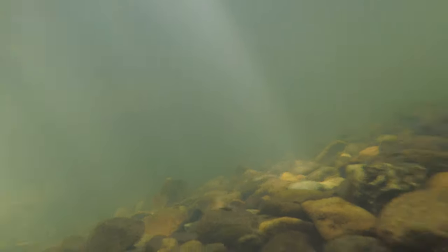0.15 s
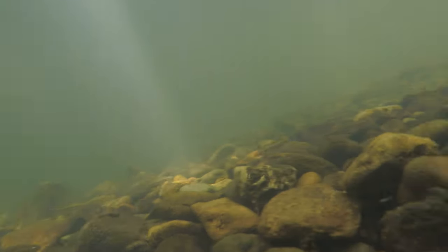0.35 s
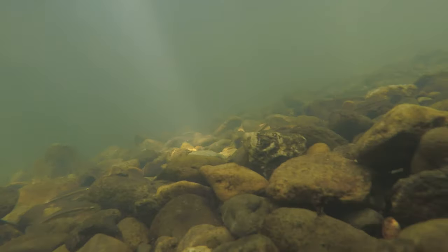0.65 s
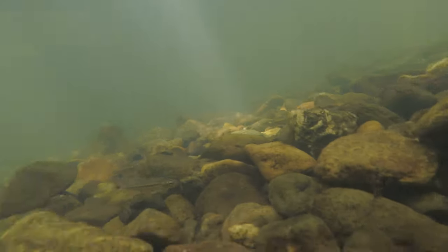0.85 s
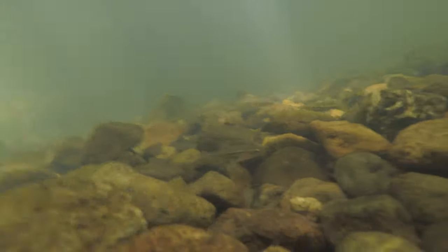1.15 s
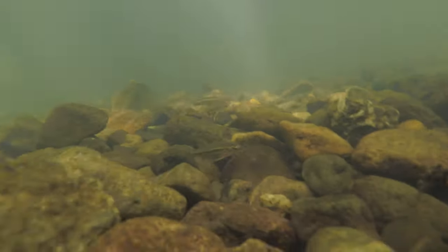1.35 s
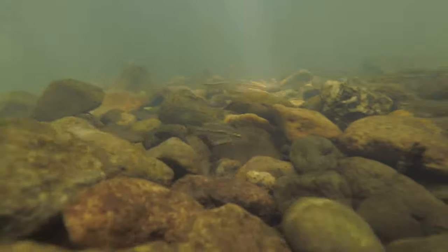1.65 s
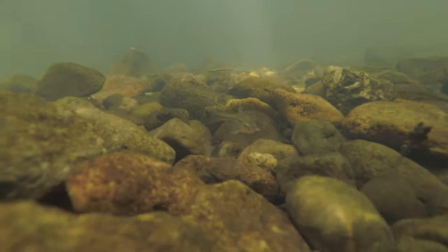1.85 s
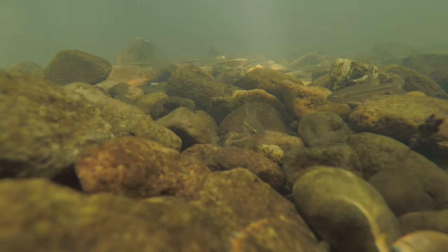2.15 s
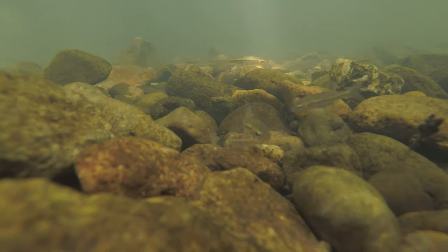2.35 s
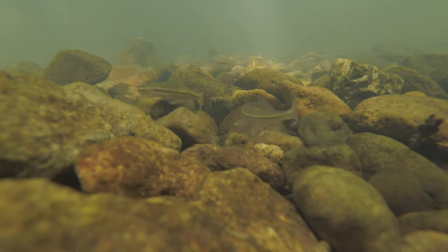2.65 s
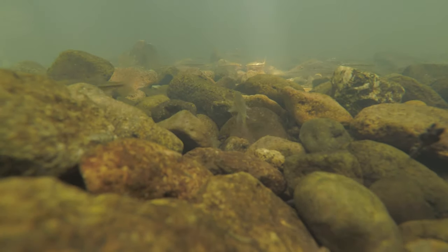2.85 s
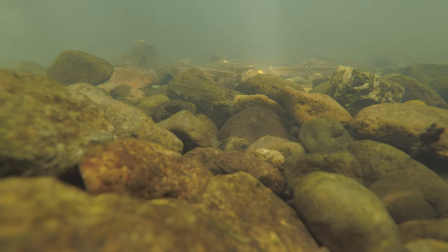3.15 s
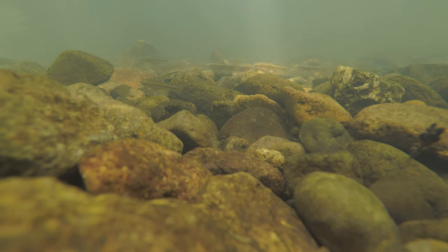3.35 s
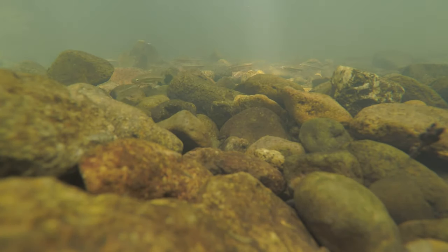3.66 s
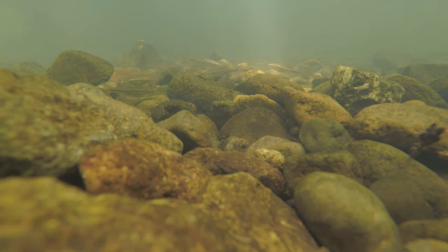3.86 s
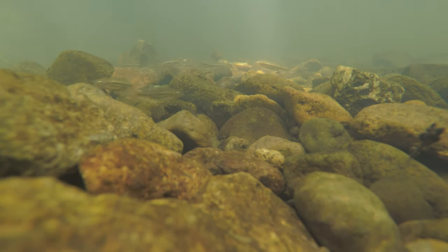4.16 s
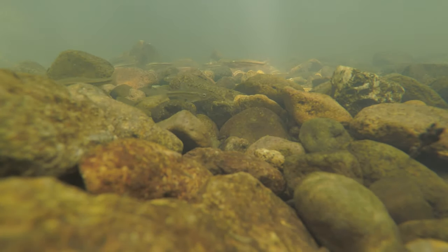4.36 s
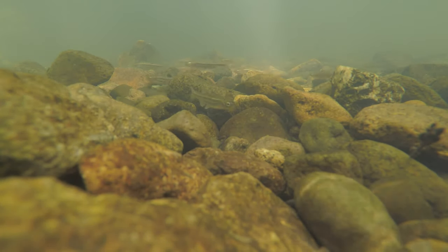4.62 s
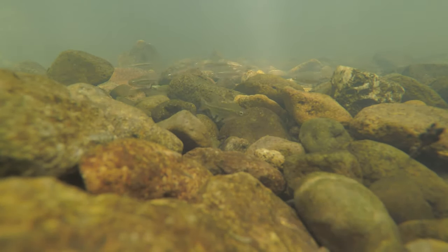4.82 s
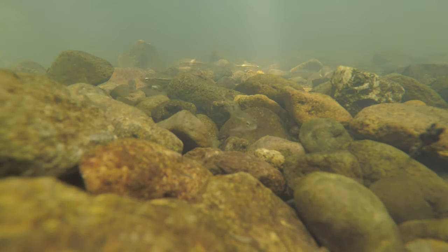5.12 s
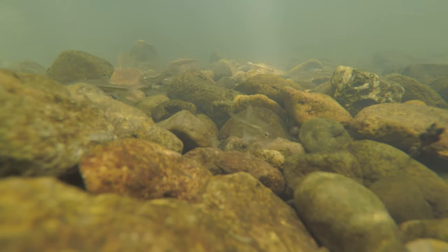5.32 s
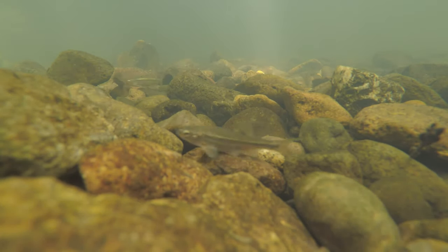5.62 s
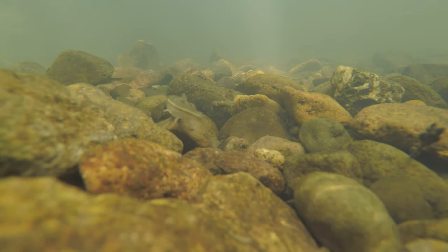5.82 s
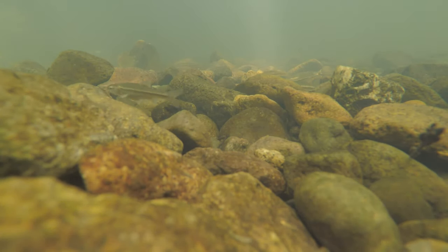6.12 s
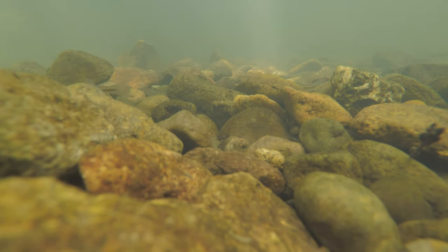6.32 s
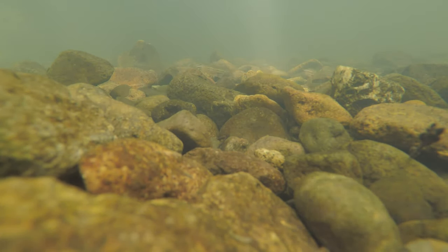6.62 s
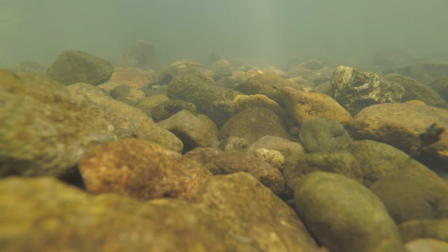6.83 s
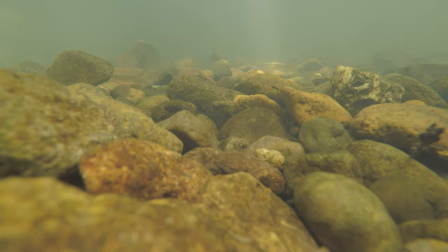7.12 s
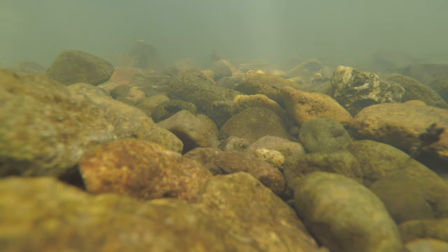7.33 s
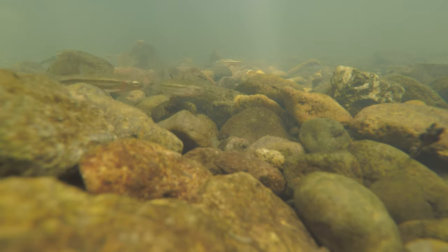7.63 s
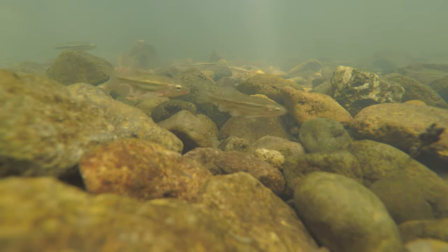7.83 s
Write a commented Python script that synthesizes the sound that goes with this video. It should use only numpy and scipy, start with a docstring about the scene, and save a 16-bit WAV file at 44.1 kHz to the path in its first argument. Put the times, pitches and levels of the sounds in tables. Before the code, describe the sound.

A sealed camera housing knocks against stones on a creek bed, heard close and muffled from inside. For the first 2 seconds, hollow bumps, low thuds and short grinding scrapes come in quick clusters with a few sharp clicks, loudest around 0.5 and 1.6 seconds. It falls almost silent until about 2.7 seconds, when a couple of thuds and a deep push of water lead into lighter, scattered bumps. Near 4.7 seconds a heavier, low grinding bump swells with the rumbling current. From about 5.2 seconds the housing drags over rock in rough strokes, and the sound widens from the centre into stereo. Tiny bubbles plink, singly at first, then in flurries around 6.5 and 7.5 seconds, with one louder plink at 7.5. A faint hiss grows beneath the rubbing until the end at about 8 seconds.

```python
"""Creek bed, heard through the shell of a sealed camera housing set down among stones.
The housing bumps and grinds on rock, lies still, then is dragged in strokes. Blows and slips ring its
shell modes; lurches and eddies drive the low ones. Small bubbles snap off and plink. Hiss swells as
the bumps die out, and one centred channel opens into two microphones that hear the shell through
different paths."""
import sys
import numpy as np
from scipy import signal
from scipy.fft import rfft, irfft, next_fast_len
from scipy.io import wavfile
from scipy.ndimage import uniform_filter1d, minimum_filter1d

SR = 44100
rng = np.random.default_rng(int(sys.argv[2]) if len(sys.argv) > 2 else 0)


def log_audio(samples):
    """Write samples as a 16-bit WAV file to the path given in sys.argv[1]."""
    # one column per channel
    frames = np.atleast_2d(samples).T
    # limit to full scale, then quantise
    limited = np.clip(frames, -1, 1)
    pcm = np.round(limited * 32767).astype(np.int16)
    wavfile.write(sys.argv[1], SR, pcm)


N = 351918
FFT_SIZE = next_fast_len(N + 4096)
BIN_HZ = np.maximum(np.arange(FFT_SIZE // 2 + 1) * SR / FFT_SIZE, 1)

# bumps on stone: peak t/s, level/dB, length/ms, centre f/Hz, thud/dB
STONE_BUMPS = [(.125, -34, 45, 720, -39), (.163, -29.5, 15, 733, -50), (0.207, -28, 16, 743, -29.5),
               (.231, -27.5, 10, 643, -42), (0.252, -25.5, 3.3, 753, -43), (0.27, -26, 11, 564, -24),
               (.307, -24.5, 31, 530, -26), (.331, -20.5, 11, 720, -32), (.345, -17, 24, 647, -23),
               (.398, -21, 9.2, 624, -36), (.41, -19, 8.7, 789, -26), (.467, -17.5, 35, 720, -22.5),
               (.491, -10, 18, 630, -16.5), (0.53, -20, 20, 560, -19.5), (0.565, -30.5, 6.2, 620, -47),
               (0.625, -46.5, 34, 560, -58), (0.698, -31, 12.2, 870, -41), (.755, -36, 11.4, 795, -38.5),
               (0.788, -40.5, 10.6, 776, -41.5), (.981, -20.5, 14.8, 826, -29.5),
               (1.003, -18.5, 24, 714, -36), (1.148, -19.5, 9.6, 378, -28.5), (1.191, -26.5, 7.1, 680, -33),
               (1.248, -16, 12.3, 470, -18.5), (1.307, -15, 17, 766, -18.5),
               (1.333, -15.5, 13.5, 730, -26.5), (1.417, -24, 8.7, 512, -23), (1.477, -22, 10, 680, -26),
               (1.543, -17, 8.6, 715, -28), (1.572, -12, 6, 900, -17.5), (1.608, -32.5, 12, 670, -28.5),
               (1.675, -39.5, 4.4, 750, -52), (1.741, -22, 13, 746, -33), (1.751, -16.5, 12, 618, -24.5),
               (1.797, -27.5, 9.7, 690, -24.5), (1.814, -19.5, 10, 804, -30.5), (1.903, -37, 33, 665, -40),
               (1.973, -21, 2.5, 737, -18.5), (1.988, -22, 14, 625, -21.5), (2.04, -19.5, 8.7, 855, -26),
               (2.124, -53, 24, 690, -62), (2.293, -55.5, 9.1, 702, -73), (2.568, -54.5, 27, 775, -54),
               (2.63, -56, 3.8, 890, -69), (2.732, -48, 12, 623, -44), (2.788, -36.5, 71, 468, -35.5),
               (2.857, -31, 5.9, 700, -13), (2.902, -48, 11, 520, -32), (2.984, -47.5, 49, 898, -64),
               (3.014, -36, 17, 553, -37.5), (3.061, -32, 14, 678, -24), (3.074, -38, 7.4, 455, -19.5),
               (3.232, -44.5, 7, 418, -39), (3.303, -46, 54, 415, -57), (3.382, -38, 18, 342, -39.5),
               (3.518, -35, 8.5, 354, -48), (3.616, -39, 25, 460, -53), (3.649, -34, 13, 400, -37),
               (3.685, -41, 12, 775, -51), (3.728, -46, 25, 674, -49), (3.752, -39, 10, 570, -34),
               (3.775, -39, 24, 550, -38), (3.87, -37.5, 26, 410, -34), (3.904, -25.5, 11, 504, -28.5),
               (3.935, -38, 9.5, 546, -33), (3.955, -37, 6.1, 830, -32), (4.051, -32, 8.8, 460, -35.5),
               (4.133, -33.5, 8.3, 650, -63), (4.222, -39, 28, 557, -41.5), (4.253, -46, 6.2, 596, -49),
               (4.391, -27.5, 16, 564, -63), (4.424, -29, 4.4, 460, -31), (4.46, -36.5, 18, 440, -60),
               (4.488, -39.5, 6, 700, -34), (4.544, -31, 17, 547, -25), (4.586, -34, 35, 564, -47),
               (4.635, -24.5, 15, 556, -48), (4.689, -30, 65, 580, -40), (4.75, -17.5, 64, 320, -18),
               (4.799, -19.5, 98, 357, -21.5), (4.847, -21, 100, 406, -23), (4.929, -39, 27, 550, -25.5),
               (4.972, -37.5, 47, 630, -45), (5.04, -32, 16, 687, -54), (5.102, -43.5, 13, 490, -24.5),
               (5.208, -23.5, 46, 887, -40), (5.235, -27, 19, 556, -55), (5.545, -28, 10, 584, -20),
               (6.285, -31.5, 14, 965, -46), (7.346, -34, 26, 830, -51)]
# shell response: f/Hz, centred/dB, left/dB, right/dB
SHELL_RESPONSE = [(186, 0, -3, -35), (268, 1.5, -12, -8.5), (422, -12.5, -10, -3.5), (544, 3.5, -8.5, -4.5),
                  (753, -8, 5.5, 2), (870, 1.5, 9.5, -12), (1032, -9, -2.5, -30), (1045, -12, -1.5, -13),
                  (1390, -20.5, 5, -2), (1600, -29, -6.5, -1.5), (1604, -20, -19, -3),
                  (2095, -39, -8.5, -12), (2980, -50.5, -42.5, -43.5), (4400, -56.5, -45.5, -40.5),
                  (5100, -67.5, -58.5, -53.5), (5500, -65.5, -47, -50), (7940, -76, -66.5, -42),
                  (11000, -76, -62.5, -57)]
# phase lead of left over right: f/Hz, lead/rad
LEFT_LEAD = [(200, 0), (300, -1.1), (430, -4.1), (550, -5.1), (690, -4), (900, -3.5), (1100, 1.2),
             (1300, 3.3), (1550, 4.1), (1800, 3.5), (2400, 3.5), (2900, 5.1), (4000, 7), (5500, 5.6),
             (7000, 6), (8000, 9.4)]
# stereo opening: t/s, two-microphone share
PAIR_SHARE = [(0, 0.009), (5.25, 0), (5.6, 0.36), (6.0, 0.69), (6.6, 0.91), (7.98, 0.86)]


def amp(db):
    return 10 ** (np.asarray(db) / 20)


def unit_rms(x):
    return x / np.sqrt(np.mean(x ** 2) + 1e-20)


def in_time(rows):
    """Table columns as per-sample curves."""
    times, *columns = np.transpose(rows)
    return [np.interp(np.arange(N) / SR, times, c) for c in columns]


def at_hz(rows, hz):
    """Table columns read on a log-frequency axis."""
    f, *columns = np.transpose(rows)
    return [np.interp(np.log(hz), np.log(np.maximum(f, 1)), c) for c in columns]


def shaped(x, response):
    return irfft(rfft(x, FFT_SIZE) * response, FFT_SIZE)[..., :N]


def drift(rate_hz):
    """Smooth random curve, unit rms."""
    r = np.exp(-2 * np.pi * rate_hz / SR)
    return unit_rms(signal.lfilter([1], [1, -2 * r, r * r], rng.standard_normal(N + SR))[SR:])


def ring(clicks, hz, t60_s):
    """One mode: a unit click starts a unit decaying sine."""
    r, w = amp(-60 / (t60_s * SR)), 2 * np.pi * hz / SR
    return signal.lfilter([0, np.sin(w)], [1, -2 * r * np.cos(w), r * r], clicks + 1e-18)


def plateau(t, start_s, length_s, rise_db_per_s, fall_db_per_s):
    """Unit gain during a contact, linear dB slopes either side."""
    before_s, after_s = np.maximum(start_s - t, 0), np.maximum(t - start_s - length_s, 0)
    return amp(-rise_db_per_s * before_s - fall_db_per_s * after_s)


def bumps(spread_oct, skirt_db, rise_share, sink_ms_per_oct, edge_hz, edge_share, blow):
    """Shell hits stone: a short grind, sinking in pitch, round one clean blow with a bright edge."""
    # bump spectrum: f/Hz, density/dB
    spectrum = [(120, -21), (200, 10), (379, -4.5), (561, -1), (753, 0.5), (1130, 0), (1230, -4),
                (2330, -43.5), (3080, -52), (10000, -75.5), (13000, -106), (22000, -120)]
    size = 4096
    out = np.zeros(N + 2 * size)
    ms = (np.arange(size) - size // 2) * 1000 / SR
    hz = np.maximum(np.arange(size // 2 + 1) * SR / size, 1)
    colour = amp(at_hz(spectrum, hz)[0])
    bright = 1 / (1 + (edge_hz / hz) ** 6)
    for s, db, length_ms, centre_hz, _ in STONE_BUMPS:
        grind = rng.standard_normal(size)
        rise_ms, fall_ms = rise_share * length_ms, (1 - rise_share) * length_ms
        swell = np.exp(-.8 * np.where(ms < 0, np.abs(ms / rise_ms) ** 1.4, np.abs(ms / fall_ms) ** 1.13))
        strike = blow * np.linalg.norm(swell) * (ms == 0)
        focus = np.exp(-.5 * (np.log2(hz / centre_hz) / spread_oct) ** 2) + amp(skirt_db)
        delay_s = sink_ms_per_oct / 1000 * np.clip(np.log2(centre_hz / hz), -1, 2)  # low modes lag
        sink = np.exp(-2j * np.pi * np.cumsum(delay_s) * SR / size)
        body = rfft(grind * swell + strike) * focus * (1 - bright) * sink
        edge_env = np.exp(-np.abs(ms / (edge_share * min(rise_ms, fall_ms))) ** 1.4)
        edge_db = 1.6 * (db + 23.5) - 11.5 + 24 * np.log2(centre_hz / 700)  # hard, high bumps: brighter
        edge = rfft(grind * edge_env) * bright * amp(edge_db)
        burst = irfft((body + edge) * colour) * signal.windows.tukey(size, .5)
        peak_rms = np.sqrt(uniform_filter1d(burst ** 2, size=350).max())
        at = round(s * SR) + size // 2
        out[at:at + size] += amp(db) * burst / peak_rms
    return out[size:size + N]


def thuds(soft_hz, gain_db, early_ms, scatter_db):
    """The housing lurches at each bump: a soft push into its low modes, each with its own strength."""
    # housing modes: f/Hz, level/dB, t60/s
    modes = [(40.7, -12.5, 0.21), (70, -1.5, 0.13), (87, 0.5, 0.11), (123.8, 4.5, 0.09),
             (162.3, 1.5, 0.067), (253, -9, 0.02), (344.8, -14, 0.12)]
    at = [round((row[0] - early_ms / 1000) * SR) for row in STONE_BUMPS]
    thud_db = np.array(STONE_BUMPS)[:, -1] + gain_db
    offset_db = scatter_db * rng.standard_normal((len(at), len(modes)))
    out = np.zeros(N)
    for k, (hz, db, t60_s) in enumerate(modes):
        pushes = np.zeros(N)
        pushes[at] = amp(thud_db + db + offset_db[:, k]) * (-1) ** k
        out += ring(pushes, hz, t60_s)
    return signal.lfilter(*signal.butter(1, soft_hz, fs=SR), out)


def contact_levels(wear_db_per_s, scuff_db, stir_db):
    """Rub, rumble, coarse and fine grit in dB: strokes and bump scuffs over the settling floor."""
    # strokes on stone: t/s, length/s, rub/dB, swell by the end/dB, rumble/dB, coarse/dB, fine/dB
    strokes = [(0.193, 0.32, -33, 4, -43.5, -59.5, -79), (0.456, 0.047, -43, -7.5, -45, -44.5, -66),
               (0.78, 0.1, -62, -1.5, -52.5, -77, -100), (1.141, 0.19, -30.5, -7.5, -37.5, -78, -84.5),
               (1.433, 0.077, -56.5, 12.5, -53.5, -85, -100), (1.548, 0.025, -29.5, 5, -55, -46, -71.5),
               (1.607, 0.04, -46.5, 2, -43.5, -78, -101), (1.712, 0.1, -34.5, -3, -40, -62, -83),
               (1.879, 0.064, -52.5, 16, -53, -69, -99), (1.959, 0.05, -37, 8.5, -36, -47, -86),
               (2.765, 0.025, -48, 2, -39.5, -51, -72.5), (2.833, 0.02, -41.5, 13, -36, -51.5, -68.5),
               (4.693, 0.2, -28.5, -8.5, -24.5, -88, -74.5), (5.197, 0.37, -24.5, 5.5, -33.5, -49, -70.5),
               (5.59, 0.23, -32.5, 2.5, -37.5, -65, -95), (5.858, 0.23, -24.5, -2.5, -35, -52.5, -73.5),
               (6.074, 0.16, -22, -3.5, -33, -68, -85), (6.778, 0.28, -33, 6, -45.5, -54, -70),
               (6.81, 0.024, -47, -3, -60, -64, -71.5), (7.637, .07, -45, 8, -70, -56.5, -73),
               (7.61, 0.55, -33, -1, -63, -57, -71)]
    # floor as the housing settles: t/s, rub/dB, rumble/dB
    settling = [(0, -36.5, -47), (.1, -44.5, -40), (.62, -52, -59), (.93, -81, -67.5), (2.35, -86.5, -77),
                (2.7, -66.5, -50.5), (3.1, -63.5, -61), (3.4, -64.5, -56), (3.6, -45, -45),
                (4.2, -54, -47.5), (4.52, -44, -46), (4.65, -42, -31.5), (5.0, -53, -32), (6.3, -37, -43.5),
                (6.55, -36.5, -45), (7.1, -36, -46.5), (7.3, -46, -52.5), (7.6, -39, -54), (7.98, -39, -47)]
    # grit floor: t/s, coarse/dB, fine/dB
    settling_grit = [(0, -94.5, -100), (2.6, -90, -100), (3.5, -71, -83.5), (5.2, -65.5, -88),
                     (6.3, -63, -82.5), (6.8, -65, -81), (7.3, -76.5, -84), (7.6, -61, -82.5),
                     (7.98, -81, -91)]
    t = np.arange(0, N, 32) / SR
    power = np.zeros((4, len(t)))
    for s, length_s, rub_db, swell_db, rumble_db, coarse_db, fine_db in strokes:
        gain = plateau(t, s, length_s, rise_db_per_s=705, fall_db_per_s=453.5)
        along_s = np.clip(t - s, 0, length_s)
        swell, wear = swell_db * along_s / length_s, -wear_db_per_s * along_s
        power += (gain * amp([rub_db + swell, rumble_db + swell, coarse_db + wear, fine_db + wear])) ** 2
    for s, db, _, _, thud_db in STONE_BUMPS:  # each scuffs the stone and stirs the water
        gain = plateau(t, s, 0, rise_db_per_s=504, fall_db_per_s=365)
        power[:2] += (gain * amp([[db + scuff_db], [thud_db + stir_db]])) ** 2
    floor = amp(in_time(settling) + in_time(settling_grit)) ** 2
    return 10 * np.log10(floor + [np.interp(np.arange(N) / SR, t, p) for p in power])


def rubbing(rub_db, coarse_db, fine_db, slips_per_s, coarse_hz, fine_hz):
    """Dense, lumpy slips on rough stone; grit breaks in bursts and rings the upper modes."""
    # unevenness of the rub: t/s, depth/dB
    rocking = [(3.0, 1.5), (3.5, 2.6), (4.6, 2.5), (5.2, 1.03)]
    slips = (rng.random(N) < slips_per_s / SR) * rng.choice([-1, 1], N)
    size_db = 3 * np.minimum(rng.exponential(1, N), 4)
    lumps_db = in_time(rocking)[0] * (drift(32) + 1.14 * drift(21))
    shell = amp(at_hz(SHELL_RESPONSE, BIN_HZ)[0])
    shell = shell / (1 + (210 / BIN_HZ) ** 4) / (1 + (BIN_HZ / 11000) ** 6)
    high, higher = (1 / (1 + (hz / BIN_HZ) ** 8) for hz in (coarse_hz, fine_hz))
    bands = shell * [1 - high, high * (1 - higher), higher]
    body, coarse, fine = shaped(slips * amp(size_db + lumps_db), bands)
    crunch = amp(2 * (drift(120) + 0.69 * drift(13)))
    coarse, fine = crunch * shell_ring([coarse, fine])
    return amp(rub_db) * unit_rms(body) + amp(coarse_db) * unit_rms(coarse) + amp(fine_db) * unit_rms(fine)


def taps(decay_ms, bands_hz, gain_db):
    """Hard touches inside the grinds: brief noise puffs, each with its own share of treble."""
    # touches: t/s, level/dB, treble re level/dB
    touches = [(0.2196, -32, -20), (0.2318, -43, -36), (0.2658, -30, -40), (0.3017, -28.5, -32.5),
               (0.3394, -21, -26), (0.3918, -28.5, -19), (0.4078, -33.5, -13), (0.457, -28, -23),
               (0.4872, -18.5, -23), (0.4912, -12, -20), (0.5268, -20.5, -29), (0.6952, -44, -41),
               (0.9768, -25.5, -34), (0.9986, -44.5, -33), (1.1408, -31, -37), (1.2372, -46, -33.5),
               (1.3042, -23.5, -36), (1.3319, -18, -27), (1.5388, -34.5, -18), (1.559, -23.5, -17.5),
               (1.571, -14.5, -18.5), (1.6066, -38.5, -28), (1.7335, -44, -25), (1.788, -45, -34),
               (1.8135, -34.5, -32.5), (1.963, -22, -29), (1.9751, -14.5, -31.5), (1.9883, -38, -33),
               (2.033, -46.5, -28), (3.0579, -37, -8)]
    out, t = np.zeros((2, N)), np.arange(600) / SR
    for s, db, treble_db in touches:
        puff = rng.standard_normal(len(t)) * np.exp(-1000 * t / decay_ms)
        at = round(s * SR)
        out[:, at:at + len(t)] += amp([[db], [db + treble_db]]) * amp(gain_db) * puff
    bands = [signal.butter(4, edges, "band", fs=SR, output="sos") for edges in bands_hz]
    return sum(signal.sosfilt(band, x + 1e-18) for band, x in zip(bands, out))


def brief_tones(rough_db):
    """Brief tones that swell and fade unevenly, mostly around the knocks."""
    # tones: peak t/s, level/dB, f/Hz, 1/e half length/ms
    tones = [(.394, -20, 537, 13), (.41, -15, 604, 11), (0.451, -43.5, 1653, 19), (.468, -26, 950, 6.5),
             (0.516, -49, 1924, 24), (.65, -75, 1990, 30), (.972, -50, 1965, 9.1), (1.292, -27.5, 1245, 8),
             (1.469, -50, 1070, 7.8), (1.533, -27.5, 1070, 8.9), (1.567, -17.5, 1126, 5),
             (2.095, -55.5, 1210, 12.7), (2.704, -55, 1220, 8.9), (2.86, -14.5, 364, 6.3),
             (3.059, -32, 1010, 2.1), (3.073, -20, 464, 6.4)]
    out, t = np.zeros(N), np.arange(-2048, 2048) / SR
    for s, db, hz, half_ms in tones:
        envelope = np.exp(-(1000 * t / half_ms) ** 2)
        at = round(s * SR)
        out[at - 2048:at + 2048] += amp(db) * envelope * np.sin(2 * np.pi * hz * t)
    return out * amp(rough_db * drift(90))


def bright_clicks(low_hz, high_hz, gain_db):
    """Sharp, broad, bright clicks among the knocks."""
    # clicks: t/s, level/dB
    clicks = [(0.1865, -60), (0.22, -59.5), (0.3405, -56), (0.354, -50.5), (0.4193, -64), (0.5406, -58),
              (0.7531, -61), (1.008, -54.5), (1.187, -57), (1.254, -52.5), (1.3207, -54.5), (1.332, -52.5),
              (1.488, -58), (1.542, -55), (1.5727, -51.5), (1.7538, -50), (1.821, -57), (3.058, -47.5)]
    impulses = np.zeros(N)
    for s, db in clicks:
        impulses[round(s * SR)] = amp(db + gain_db)
    treble = signal.lfilter(*signal.butter(2, low_hz, "high", fs=SR), impulses + 1e-18)
    return signal.lfilter(*signal.butter(2, high_hz, fs=SR), treble)


def shell_ring(x):
    """The shell rings on at its hollow upper modes."""
    # upper modes: f/Hz, width/Hz, lift/dB
    modes = [(1937, 24, 3.5), (2395, 63, 6), (2800, 120, 4), (3616, 820, 5), (5090, 640, 5), (5980, 260, 5)]
    peaks = sum((amp(db) - 1) / (1 + 1j * (BIN_HZ - hz ** 2 / BIN_HZ) / width_hz)
                for hz, width_hz, db in modes)
    return shaped(x, 1 + peaks)


def two_microphones(centred, width):
    """Fade the centred shell sound into a pair, each with its own colour and phase."""
    centre_db, left_db, right_db = at_hz(SHELL_RESPONSE, BIN_HZ)
    phase = np.exp(1j * at_hz(LEFT_LEAD, BIN_HZ)[0] * [[1], [0]])
    pair = shaped(centred, amp([left_db, right_db] - centre_db) * phase)
    return (1 - width) * centred + width * pair


def plinks(random_bubbles, cycles, rise_ms, max_glide, snap_db):
    """Each bubble snaps off and rings, gliding a little; the pair hears it with the shell's phase lead."""
    # distinct bubbles: t/s, level/dB, f/Hz, left minus right/dB
    distinct = [(3.526, -40, 9650, 0), (3.91, -36, 9600, 0), (4.067, -51, 3360, 0), (4.541, -39, 7150, 0),
                (5.106, -48, 3640, 0), (5.218, -43, 3550, -2), (5.311, -33.5, 2080, 2),
                (5.778, -36, 6050, -4), (5.778, -40, 2230, 8), (6.343, -48, 3780, -3),
                (6.411, -39, 6500, -3), (6.437, -41, 4130, -4), (6.442, -37, 8500, -16),
                (6.448, -36, 4000, -3), (6.489, -31, 4130, -4), (6.5, -33, 7500, -10),
                (6.547, -39, 2640, -4), (6.615, -40, 6200, -4), (6.66, -53, 4700, -3),
                (6.683, -46, 3800, -3), (7.366, -46, 4900, -2), (7.458, -48, 3500, -2),
                (7.473, -40, 5270, -2), (7.473, -42, 6200, -2), (7.484, -31, 1800, 6),
                (7.517, -43, 4700, -2), (7.517, -39, 7900, -15), (7.535, -36, 5800, -3),
                (7.535, -41, 8180, -18), (7.559, -38, 7000, -6), (7.565, -30, 2220, 5),
                (7.547, -46, 3660, -2), (7.549, -14.5, 1930, 3)]
    size = 2048
    out, t = np.zeros((2, N + size)), np.arange(size) / SR
    for s, db, hz, pan_db in distinct + random_bubbles:
        life, glide, snap_pitch = rng.random(3)
        pair_open = np.interp(s, *np.transpose(PAIR_SHARE)) > .3
        lead_rad = at_hz(LEFT_LEAD, hz)[0] * pair_open * np.array([[1], [0]])
        t60_s = 55 * cycles * (.6 + .8 * life) / hz ** 1.5  # `cycles` periods on average near 3 kHz
        envelope = (1 - np.exp(-1000 * t / rise_ms)) * amp(-60 * t / t60_s)
        bend = 1 + max_glide * (2 * glide - 1) * t * hz / cycles
        tone = envelope * np.sin(2 * np.pi * hz * t * bend + lead_rad)
        snap_hz = hz * (.6 + .8 * snap_pitch)
        snap = amp(snap_db) * np.exp(-t * hz) * np.sin(2 * np.pi * snap_hz * t + lead_rad)
        at = round(s * SR)
        out[:, at:at + size] += amp([[db + pan_db / 2], [db - pan_db / 2]]) * (tone + snap)
    return out[:, :N]


def bubble_clouds(per_cloud, spread_db, small_cut_db):
    """Flurries of bubbles shaken loose, random in size and strength; rows for plinks()."""
    # clouds: t/s, length/s, top level/dB
    clouds = [(5.75, .1, -42), (6.2, .19, -42), (6.4, .12, -42), (6.52, .19, -43), (7.2, .2, -48),
              (7.44, .14, -43), (7.6, .3, -40)]
    start_s, length_s, top_db = np.transpose(clouds)
    when, small, weak, side = rng.random((len(clouds), per_cloud, 4)).T
    db = top_db - spread_db * weak - small_cut_db * small
    columns = start_s + when * length_s, db, 1300 * 5.5 ** small, -6 * side
    return list(zip(*np.reshape(columns, (4, -1))))


def stray_bubbles(coarse_db, fine_db, count, over_db, spread_db):
    """Faint random bubbles: big ones follow the coarse grit level, small the fine; rows for plinks()."""
    when, small, weak, side = rng.random((count, 4)).T
    at = (when * N).astype(int)
    db = (1 - small) * coarse_db[at] + small * fine_db[at] + over_db - spread_db * weak
    return list(zip(when * N / SR, db, 1400 * 2.6 ** small, -6 * side * (when > .7)))


def rumble(level_db, lumpy_db, surge_hz):
    """Eddies press on the housing: lumpy noise in its low modes over a deeper surge."""
    # eddy spectrum: f/Hz, density/dB
    spectrum = [(32, -32), (55, 8), (81, 10.5), (116, 7.5), (172, -7.5), (258, -20), (300, -16.5),
                (390, -27.5), (660, -120)]
    # deep push of the current: t/s, level/dB
    push = [(0.0, -76), (0.31, -49), (1.0, -67), (1.38, -51.5), (2.42, -59), (2.75, -50.5), (3.12, -34),
            (3.44, -48), (5.93, -39), (7.98, -55)]
    eddies = shaped(rng.standard_normal(N), amp(at_hz(spectrum, BIN_HZ)[0]))
    surge_band = 1 / (1 + (20 / BIN_HZ) ** 4) / (1 + (BIN_HZ / surge_hz) ** 4)
    surge = shaped(rng.standard_normal(N), surge_band)
    lumps = amp(lumpy_db * drift(3.4))
    return amp(level_db) * unit_rms(eddies * lumps) + amp(in_time(push)[0]) * unit_rms(surge)


def hiss(width, min_apart, flicker_db):
    """Swelling hiss, mostly shared at first, then separate in each microphone."""
    # hiss spectrum: f/Hz, density/dB
    spectrum = [(760, -17), (1300, -10.5), (1520, -9.5), (1830, -5.5), (3450, -17.5), (7680, -20),
                (10100, -19), (14000, -33.5), (15600, -47.5)]
    # hiss swell: t/s, level/dB
    swell = [(0, -85.5), (2.04, -88.5), (3.75, -68.5), (5.0, -65), (7.05, -60.5), (7.3, -64.5), (7.65, -59),
             (7.98, -60.5)]
    shared, left, right = shaped(rng.standard_normal((3, N)), amp(at_hz(spectrum, BIN_HZ)[0]))
    apart = np.clip(min_apart + width, 0, 1)
    pair = np.sqrt(1 - apart) * shared + np.sqrt(apart) * np.array([left, right])
    return amp(in_time(swell)[0] + flicker_db * drift(4.9)) * unit_rms(pair)


def scene():
    """Stone on shell, opened into two channels, over rumble, bubbles and hiss."""
    rub_db, rumble_db, coarse_db, fine_db = contact_levels(wear_db_per_s=9, scuff_db=-32, stir_db=-25)
    width = in_time(PAIR_SHARE)[0]
    rub = rubbing(rub_db, coarse_db, fine_db, slips_per_s=5000, coarse_hz=1224, fine_hz=2650)
    knocks = bumps(spread_oct=0.49, skirt_db=-16.5, rise_share=0.49, sink_ms_per_oct=2.784,
                   edge_hz=1114, edge_share=0.42, blow=0.68)
    touches = taps(decay_ms=2.3, bands_hz=([1000, 2000], [2000, 4030]), gain_db=4.5)
    fade_in = np.minimum(np.arange(N) / 64, 1)
    shell = two_microphones(shell_ring(fade_in * (rub + knocks)) + touches, width)
    lurches = thuds(soft_hz=316, gain_db=-1.5, early_ms=5.5, scatter_db=3.36)
    clicks = bright_clicks(low_hz=2500, high_hz=8900, gain_db=13)
    current = rumble(rumble_db, lumpy_db=3.5, surge_hz=56.7)
    strays = stray_bubbles(coarse_db, fine_db, count=700, over_db=13, spread_db=16)
    flurries = bubble_clouds(per_cloud=30, spread_db=12, small_cut_db=12)
    bubbles = plinks(strays + flurries, cycles=44, rise_ms=1, max_glide=0.083, snap_db=-10)
    foreground = shell + lurches + clicks + brief_tones(rough_db=3.5)
    return foreground + bubbles + current + hiss(width, min_apart=0.18, flicker_db=1.8)


def record(dry):
    """Fast limiter on the loudest knocks, then a steep low-pass."""
    ceiling, cutoff_hz = 0.41, 15700
    needed = np.minimum(ceiling / (np.abs(dry).max(axis=0) + 1e-9), 1)
    gain = uniform_filter1d(minimum_filter1d(needed, size=160), size=160)
    return signal.sosfilt(signal.cheby2(20, 60, cutoff_hz, fs=SR, output="sos"), gain * dry)


dry = scene()
out = record(dry)
log_audio(out)
```